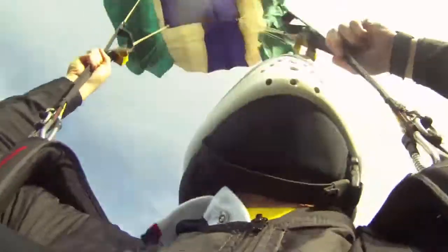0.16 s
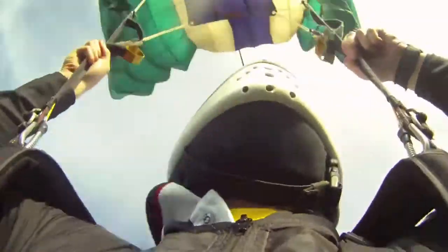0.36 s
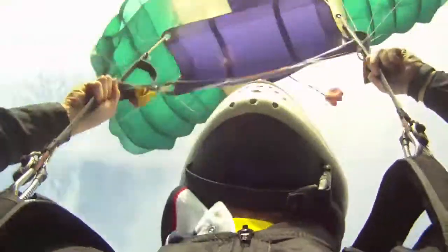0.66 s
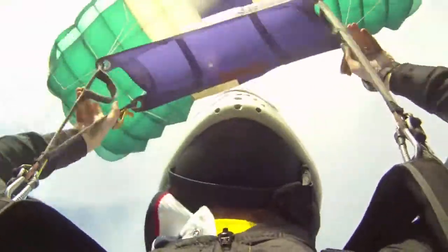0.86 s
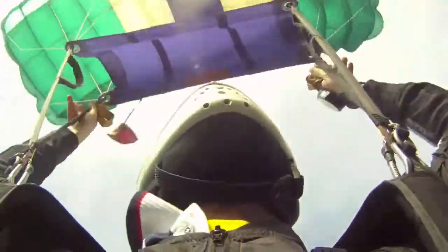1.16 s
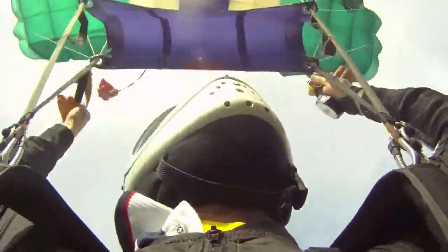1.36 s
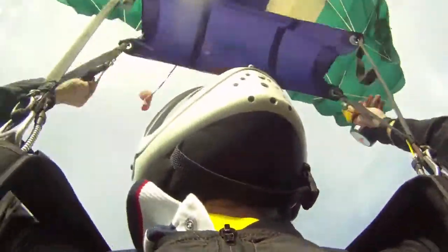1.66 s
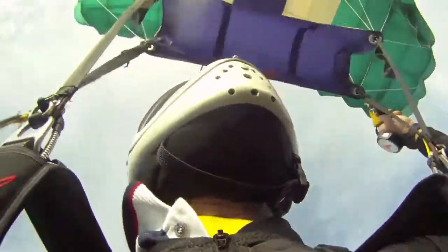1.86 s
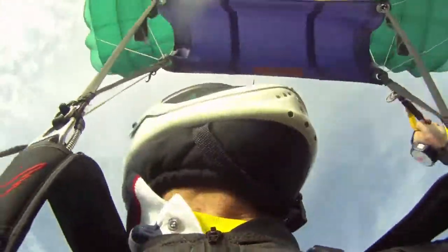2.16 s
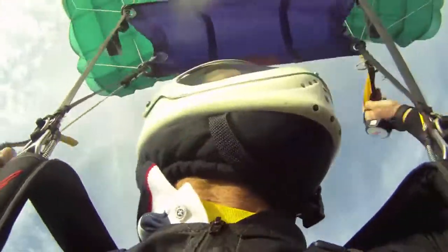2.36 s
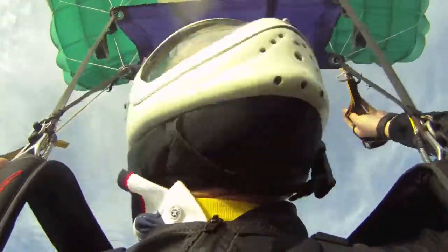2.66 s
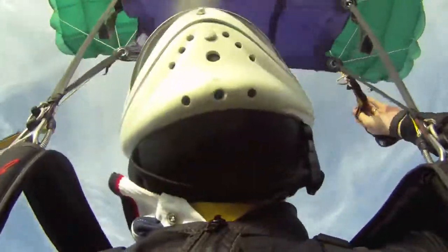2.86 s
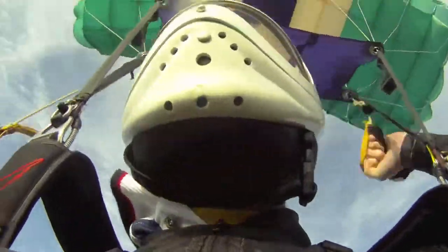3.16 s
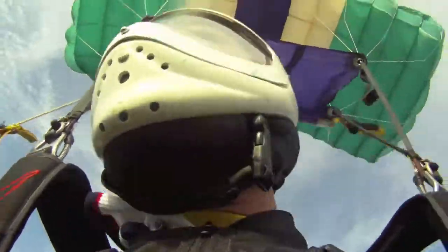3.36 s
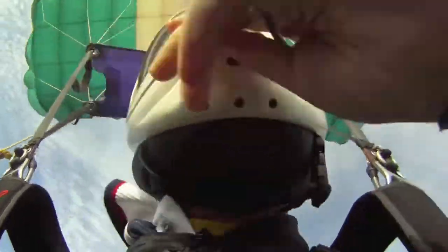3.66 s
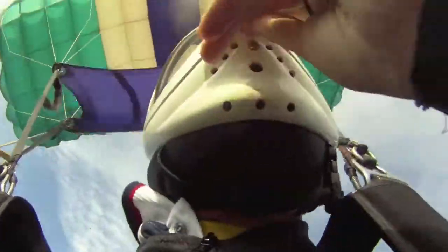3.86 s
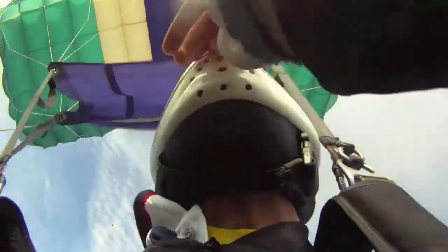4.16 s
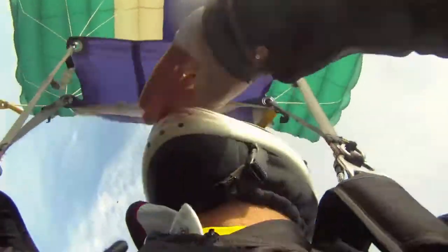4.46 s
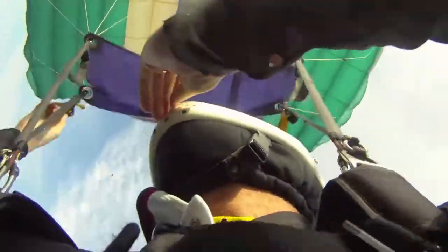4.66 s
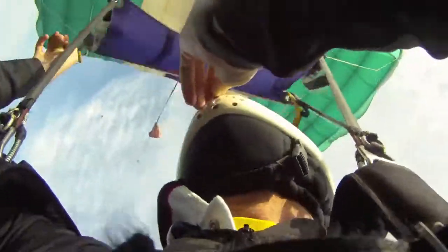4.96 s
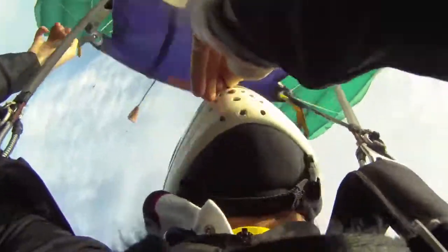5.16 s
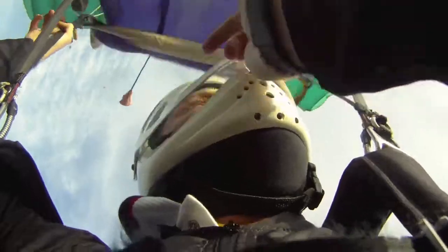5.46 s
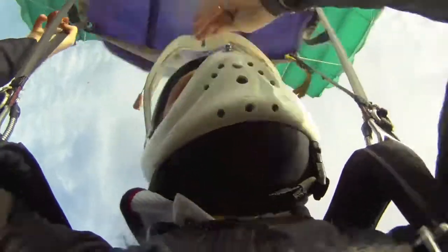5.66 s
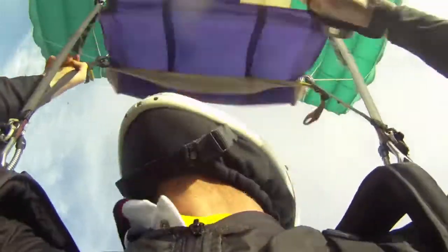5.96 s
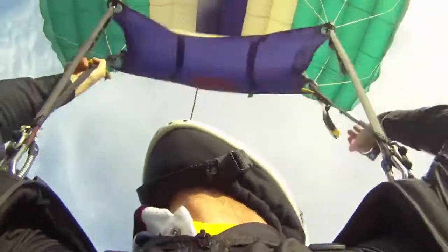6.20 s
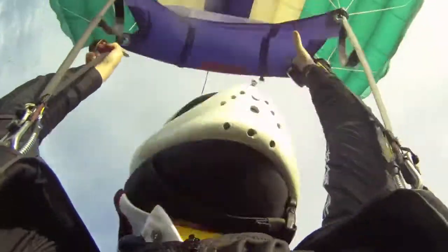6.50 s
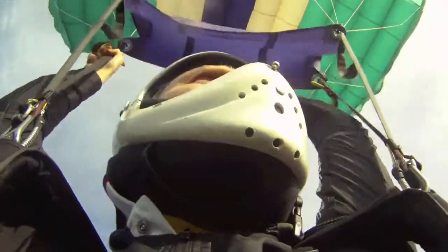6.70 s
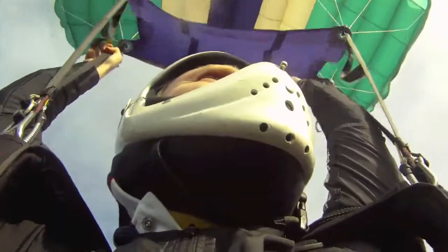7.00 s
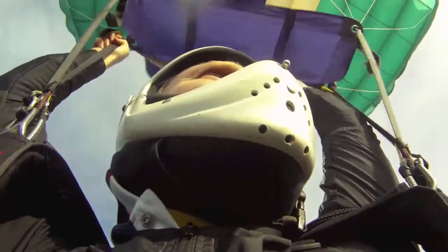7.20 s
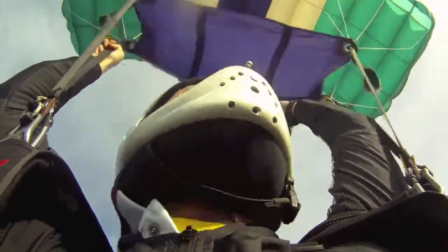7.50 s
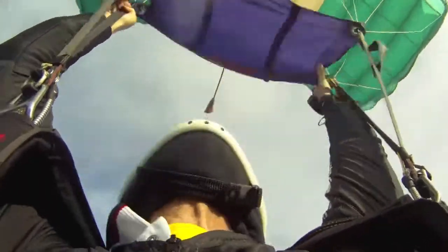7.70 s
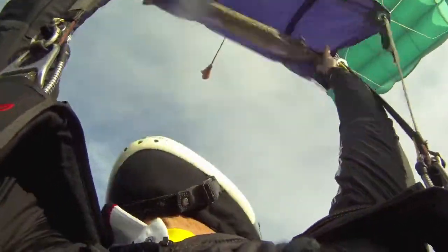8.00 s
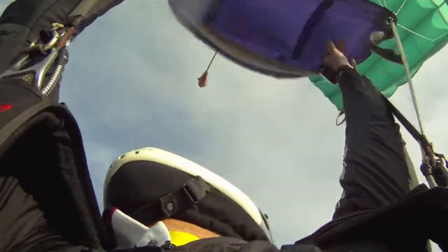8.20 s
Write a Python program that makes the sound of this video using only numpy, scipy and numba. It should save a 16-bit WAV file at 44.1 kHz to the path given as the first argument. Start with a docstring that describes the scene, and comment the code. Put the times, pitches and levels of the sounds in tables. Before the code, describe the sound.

A camera worn on the body, close in the wind under a freshly opened parachute, identical in both ears. From 0 s, low rumble and rough hiss press on its plastic case, with gust thumps near 0.2 and 0.7 s and hard ticks at about 0.3 and a strong one at 0.8 s. From 1 to 4 s the wind thins into uneven hissing surges and soft low bumps, with a few lone flaps, small clicks, a tick at 3.4 s and barely audible metal chinks. Around 4.1 s faint cloth flutter begins; a sharp tick lands at 4.5 s. From about 5.5 s, and strongly after 6 s, fabric beats around ten times a second, each slap crackling over a low throb. Brief whistles slide near 5.9, 6.4, 6.7 and 7.8 s. A hard click comes at 6.9 s, a gust at 7.7 s, and flapping continues to 8.3 s, compressed and fizzy.

```python
"""Gusts buffet the plastic housing of a body-worn camera under a freshly opened parachute: filtered noise.
Air hisses over the case as flickering noise; the cloth slider flaps, in the end about ten times a second,
each flap a noise slap plus crackle grains. Struck contacts tick and ring the housing; fittings chink as
fading noise; gliding sines whistle. A limiter and coarse held samples add a glassy fizz."""
import sys
import numpy as np
from scipy import signal
from scipy.fft import rfft, irfft
from scipy.io import wavfile
from scipy.ndimage import uniform_filter1d
from numba import njit

SR = 44100
rng = np.random.default_rng(int(sys.argv[2]) if len(sys.argv) > 2 else 0)


def output_pcm(signal):
    """Save a mono or channel-first signal as 16-bit PCM at the path in sys.argv[1].

    Samples are clipped to [-1, 1] before scaling.
    """
    pcm = np.clip(np.atleast_2d(signal).T, -1, 1) * 32767
    wavfile.write(sys.argv[1], SR, np.round(pcm).astype(np.int16))


N = 367794
TIME = np.arange(N) / SR
FREQ = np.maximum(np.fft.rfftfreq(N, 1 / SR), 1)


def undb(db):
    """Decibels to amplitude gain."""
    return 10 ** (np.asarray(db) / 20)


def curves(table):
    """Columns after the first, interpolated linearly in time."""
    time_s, *columns = np.transpose(table)
    return [np.interp(TIME, time_s, column) for column in columns]


def unit(x):
    """Scale to rms 1."""
    return x / np.sqrt(np.mean(x ** 2) + 1e-18)


def noise():
    """White Gaussian noise."""
    return rng.standard_normal(N)


def walk(rate_hz):
    """Random levels held for 1 / rate_hz, smoothed twice; rms 1."""
    hold = max(int(SR / rate_hz), 2)
    steps = np.repeat(noise()[:N // hold + 1], hold)
    smooth = uniform_filter1d(uniform_filter1d(steps, hold), hold)
    return unit(smooth[:N])


def colour(x, spectrum):
    """Shape by a spectrum interpolated over log frequency; rms 1."""
    hz, db = np.transpose(spectrum)
    gain = undb(np.interp(np.log(FREQ), np.log(hz), db))
    return unit(irfft(rfft(x) * gain, N))


def grains(rate_hz, spread_db):
    """Dense random clicks of either sign and uneven size."""
    struck = rng.random(N) < rate_hz / SR
    sign = np.sign(noise())
    return struck * sign * undb(spread_db * np.minimum(rng.exponential(size=N), 4))


def add(out, time_s, x):
    """Mix a short sound into out at time_s."""
    i = max(int(time_s * SR), 0)
    out[i:i + len(x)] += x[:N - i]


def swells(table):
    """Summed gain of Gaussian swells, from rows of (middle [s], length [s], level [dB])."""
    out = np.zeros(N)
    for middle_s, length_s, db in table:
        near = slice(*np.searchsorted(TIME, [middle_s - 2 * length_s, middle_s + 2 * length_s]))
        out[near] += undb(db) * np.exp(-(2 * (TIME[near] - middle_s) / length_s) ** 2)
    return out


# housing resonances: (frequency [Hz], width [Hz], level [dB])
HOUSING_MODES = [(550, 190, -18.5), (672, 220, -5.5), (1013, 188, -0.5), (1222, 150, 1), (1601, 254, -2),
                 (2090, 314, 2), (2440, 196, 2.5), (3176, 570, -3.5), (3628, 200, 2), (4700, 2000, -12),
                 (5150, 550, -14.5)]


def housing_ring(size=2048):
    """Causal minimum-phase ring of the plastic case, from its resonance power via the cepstrum."""
    f = np.fft.rfftfreq(size, 1 / SR)
    power = sum(undb(db) ** 2 / (1 + ((f - hz) / width_hz) ** 2 * 2) ** 2
                for hz, width_hz, db in HOUSING_MODES)
    cepstrum = irfft(np.log(power) / 2)
    cepstrum[1:size // 2] *= 2
    cepstrum[size // 2 + 1:] = 0
    return irfft(np.exp(rfft(cepstrum)))[:size // 2]


def housed(x):
    """A sound as it arrives through the case."""
    return signal.oaconvolve(x, housing_ring())[:len(x)]


# runs of even flutter, each until the next:
# (start [s], approximate rate [flaps/s], relative body [dB], relative crackle [dB], nominal flap length [s])
FLUTTER_RUNS = [(4.104, 8, -55, -72, 0.035), (4.35, 6.4, -51.5, -72, 0.012),
                (4.818, 6.2, -49, -38.5, 0.037), (5.136, 8, -51, -42.5, .028),
                (5.262, 9, -53, -43.5, 0.058), (5.483, 9.3, -44, -40, 0.02), (5.911, 11, -46, -42.5, 0.027),
                (6.002, 11.5, -43, -35.5, 0.037), (6.178, 8.4, -37.5, -35, .026),
                (6.292, 12, -48, -44, 0.064), (6.465, 10, -38, -31.5, .026), (6.666, 10, -36, -31, 0.019),
                (6.967, 10, -53, -54, 0.021), (7.063, 11, -44, -39.5, 0.043), (7.338, 10, -42, -37, 0.02),
                (7.442, 13, -42.5, -38.5, 0.017), (7.518, 10.5, -41, -35, 0.026),
                (7.712, 12, -45, -35.5, 0.019), (7.794, 9, -41, -33, 0.024), (8.23, 9, -35.5, -29.5, 0.023)]
# lone flaps before the flutter:
# (time [s], relative body [dB], relative crackle [dB], nominal length [s])
SINGLE_FLAPS = [(.643, -57, -45, .03), (1.711, -47, -74, 0.012), (2.48, -54, -47, 0.0075),
                (2.895, -50, -60, 0.016)]


def flaps():
    """Every flap as (time, body, crackle, length); a whole number of them fills each flutter run."""
    flutter = []
    end_times = [run[0] for run in FLUTTER_RUNS[1:]] + [N / SR]
    for (start_s, rate_hz, *flap), end_s in zip(FLUTTER_RUNS, end_times):
        count = max(round((end_s - start_s) * rate_hz), 1)
        flutter += [(s, *flap) for s in np.linspace(start_s, end_s, count, endpoint=False)]
    return SINGLE_FLAPS + flutter


# gust rumble spectrum: (frequency [Hz], relative level [dB])
RUMBLE_SPECTRUM = [(10, -14), (22, 2), (35, -2.5), (52, -5.5), (75, -15.5), (110, -38), (200, -89),
                   (400, -101)]
# small-eddy spectrum: (frequency [Hz], relative level [dB])
EDDY_SPECTRUM = [(40, -7.5), (90, -1), (140, -1), (200, -8.5), (300, -15.5), (500, -24.5), (1000, -22),
                 (2000, -75)]
# pressure swings after each flap: (frequency [Hz], decay [s], relative level [dB])
THROB_MODES = [(20.94, 0.05, -1.5), (48.6, 0.033, 2)]
# steady buffeting, strong during the opening and when the cloth beats hardest:
# (time [s], relative rumble level [dB])
BUFFETING_LEVEL = [(0, -37), (.55, -40), (1.0, -47.5), (4.4, -55.5), (5.7, -57.5), (6.12, -37), (7.73, -35),
                   (7.92, -49), (8.34, -42.5)]
# small eddies, dying down as the canopy slows the fall, then partly returning:
# (time [s], relative level [dB])
EDDY_LEVEL = [(0.0, -38), (0.25, -48.5), (0.74, -54.5), (0.93, -59), (3.23, -67.5), (3.37, -64),
              (4.46, -66), (6.76, -57.5), (8.34, -53.5)]
# gusts thumping the case: (middle [s], length [s], relative rumble [dB], relative eddies [dB])
GUST_THUMPS = [(0.16, 0.028, -27, -32.5), (0.676, 0.026, -20, -33), (0.873, 0.07, -35.5, -53),
               (1.16, 0.14, -41.5, -75), (1.47, 0.18, -52, -61), (1.73, 0.067, -44, -65),
               (1.906, 0.18, -34.5, -61.5), (2.095, 0.19, -42, -63), (2.73, 0.13, -39, -70),
               (3.02, 0.21, -41, -66), (3.378, 0.37, -40, -62), (4, 0.35, -41.5, -66),
               (7.741, 0.031, -30, -49)]


def buffet(rumble_db=1, eddy_db=4.0, throb_db=-4, lag_s=0.043, eddy_flicker_db=2.5, size=12000):
    """Turbulence presses on the case; a decaying pressure swing follows each flap of the cloth."""
    (rumble_curve_db,), (eddy_curve_db,) = curves(BUFFETING_LEVEL), curves(EDDY_LEVEL)
    t, pushes = np.arange(size) / SR, np.zeros(N)
    swing = sum(undb(db) * np.exp(-t / decay_s) * np.sin(2 * np.pi * hz * t)
                for hz, decay_s, db in THROB_MODES)
    for time_s, *_ in flaps():
        add(pushes, time_s + lag_s, swing)
    # random gusts recede where the cloth beats steadily
    beating = np.clip(uniform_filter1d(unit(pushes) ** 2, size=SR // 4) / 2, 0, 1)
    gusts = colour(noise(), RUMBLE_SPECTRUM) * undb(rumble_db) * (1 - beating / 2)
    rumble = gusts + undb(throb_db) * unit(pushes)
    eddies = colour(noise(), EDDY_SPECTRUM) * undb(eddy_db + eddy_flicker_db * walk(30))
    rumble_thumps = swells([(s, length_s, db) for s, length_s, db, _ in GUST_THUMPS])
    eddy_thumps = swells([(s, length_s, db) for s, length_s, _, db in GUST_THUMPS])
    rumble_gain = np.hypot(undb(rumble_curve_db), rumble_thumps)
    eddy_gain = np.hypot(undb(eddy_curve_db), eddy_thumps)
    return rumble * rumble_gain + eddies * eddy_gain


# hiss spectrum: (frequency [Hz], relative level [dB])
HISS_SPECTRUM = [(100, 24), (400, -8.5), (900, 2), (2500, 0.5), (3000, -6.5), (4000, -23), (6000, -12)]
# sharp edge of the hiss: (frequency [Hz], relative level [dB])
EDGE_SPECTRUM = [(300, -53), (2200, -12), (3000, -0.5), (4000, 4.5), (6000, -3)]
# steady airflow: (time [s], relative hiss level [dB], relative edge level [dB])
AIRFLOW_LEVEL = [(0.0, -39, -47), (0.3, -51, -60.5), (0.67, -43.5, -53), (0.86, -49, -63), (1.48, -59, -68),
                 (1.74, -52, -68), (2.39, -55.5, -68.5), (2.65, -62, -70.5), (3.11, -59, -74.5),
                 (3.41, -53.5, -71), (4.5, -55.5, -72), (5.48, -52, -60), (6.3, -51.5, -66),
                 (6.62, -49, -58.5), (7.04, -53.5, -63.5), (7.36, -57, -66.5), (7.78, -46, -56.5),
                 (8.34, -53.5, -57)]
# hiss surges as air catches an edge: (middle [s], length [s], relative level [dB])
HISS_SURGES = [(.58, .11, -37), (.665, 0.039, -34.5), (.94, 0.069, -45.5), (1.2, .16, -49.5),
               (1.66, 0.42, -51.5), (2.11, 0.082, -48), (2.42, 0.29, -48.5), (3.32, 0.19, -52.5),
               (3.72, 0.13, -50), (4.22, .16, -52.5), (4.68, 0.11, -52), (5.96, 0.16, -51.5),
               (6.7, 0.12, -66)]


def rush(hiss_db=-.5, edge_db=0.0, surge_db=0, surge_edge_db=-15, flicker_db=2.5, grit_db=-5,
         lull_db=4, lull_lead_s=0.021, lull_s=0.02, split_hz=1600, wander_db=1.48):
    """Air tears past the case in a flickering, gritty hiss that dips just before each flap."""
    flow_db, sharp_db = curves(AIRFLOW_LEVEL)
    surge = swells(HISS_SURGES) * undb(surge_db)
    lulls = swells([(time_s - lull_lead_s, lull_s, 0) for time_s, *_ in flaps()])
    air = unit(noise() + undb(grit_db) * unit(grains(1500, 6.0)))
    hiss = colour(housed(air), HISS_SPECTRUM) * np.hypot(undb(flow_db + hiss_db), surge)
    edge_gain = np.hypot(undb(sharp_db + edge_db), surge * undb(surge_edge_db))
    edge = colour(housed(noise()), EDGE_SPECTRUM) * edge_gain
    flicker = undb(flicker_db * walk(55) - lull_db * lulls)
    # the hiss turns darker and brighter as the air shifts its angle
    dark = irfft(rfft(hiss) / (1 + (FREQ / split_hz) ** 6), N)
    tilt = undb(wander_db * walk(9))
    return (dark / tilt + (hiss - dark) * tilt + edge) * flicker


# cloth slap spectrum: (frequency [Hz], relative level [dB])
SLAP_SPECTRUM = [(80, 18.5), (200, -1), (350, 8.5), (600, 9.5), (900, -5.5), (1500, -45), (4000, -59)]
# crackle spectrum ahead of the case: (frequency [Hz], relative level [dB])
CRACKLE_SPECTRUM = [(200, 28), (700, -0.5), (1200, 15), (2400, 7.5), (3400, 2.5), (6000, 1)]


def slider(body_db=-5, crackle_db=-6.0, ripple_db=3, lag_s=0.00197, crackle_share=0.5,
           first_snap_db=11, uneven=0.092, size=4096):
    """Each flap is a soft slap, a snap as the cloth goes taut, and a spray of crackles from its creases."""
    out, t = np.zeros(N), np.arange(size) / SR
    ripple = undb(ripple_db * walk(220))
    slaps = colour(noise(), SLAP_SPECTRUM) * ripple
    creases = unit(grains(2500, 2.5)) * ripple
    hz, db = np.transpose(CRACKLE_SPECTRUM)
    crackle_gain = undb(np.interp(np.log(np.fft.rfftfreq(size, 1 / SR) + 1), np.log(hz), db))
    for k, (time_s, slap_db, snap_db, nominal_s) in enumerate(flaps()):
        own = slice(k * size, (k + 1) * size)
        length_s = max(nominal_s, .005) * np.exp(uneven * rng.standard_normal())
        slap = slaps[own] * (1 - np.exp(-t / .002)) * np.exp(-(t / length_s) ** 3.0)
        spray = creases[own] * np.exp(-(t / (length_s * crackle_share)) ** 0.78)
        spray = spray + undb(first_snap_db) * (t == 0)
        crackle = housed(irfft(rfft(np.roll(spray, size // 64)) * crackle_gain))
        # scaled by the level over the first 20 ms
        add(out, time_s + lag_s, slap / slap[:SR // 50].std() * undb(slap_db + body_db))
        add(out, time_s + lag_s, crackle / crackle[:SR // 50].std() * undb(snap_db + crackle_db))
    return out


# hard ticks on the housing:
# (time [s], relative level [dB], contact band centre [Hz], chatter length [s], broadband share [dB])
HOUSING_TICKS = [(0.166, -26, 930, 0.0046, -6), (0.278, -23.5, 2090, 0.0018, -20),
                 (0.35, -20.5, 850, 0.0042, -42), (0.805, -11.5, 2340, 0.0039, -24),
                 (1.858, -33, 1380, 0.0087, -21), (2.447, -31.5, 2440, 0.0029, -28),
                 (2.936, -47, 1650, 0.0054, -27), (2.996, -49, 950, 0.0032, -29),
                 (3.391, -24, 2260, 0.0047, -24), (3.597, -41.5, 2080, 0.0034, -22),
                 (4.543, -16.5, 2420, 0.0024, -13), (4.933, -39.5, 2385, 0.0028, -22),
                 (4.988, -31, 1320, 0.0034, -10), (5.2319, -32, 2270, 0.0023, -22),
                 (6.917, -16.5, 2440, 0.0014, -7), (7.662, -32.5, 1940, 0.0064, -28),
                 (8.192, -21.5, 2480, 0.0025, -31)]


def ticks(tick_db=-4, chatter_db=-11, contact_width=0.32, size=2048):
    """A hard contact chatters for a moment and rings the case, mostly around one band."""
    out, t = np.zeros(N), np.arange(size) / SR
    f = np.maximum(np.fft.rfftfreq(size, 1 / SR), 1)
    chatters = rng.standard_normal((len(HOUSING_TICKS), size))
    for (time_s, db, hz, chatter_s, broadband_db), chatter in zip(HOUSING_TICKS, chatters):
        force = (t == 0) + undb(chatter_db) * chatter * np.exp(-(t / chatter_s) ** 4)
        contact = 1 / (1 + 1j * (f / hz - hz / f) / contact_width) + undb(broadband_db)
        ring = housed(irfft(rfft(force) * contact))
        # scaled by the level over the first 5 ms
        add(out, time_s, ring / ring[:SR // 200].std() * undb(db + tick_db))
    return out


# faint chinks of the harness fittings: (time [s], relative level [dB])
FITTING_CHINKS = [(1.1, -50), (1.923, -46.5), (3.4327, -49), (3.95, -49.5), (4.586, -49.5), (7.205, -50)]


def fittings(chink_db=-3, ring_s=0.008, size=4096):
    """Metal rings and links chink thinly: treble noise under exponential decays."""
    fade, t = np.zeros(N), np.arange(size) / SR
    for time_s, db in FITTING_CHINKS:
        add(fade, time_s, undb(db + chink_db) * np.exp(-t / ring_s))
    return fade * colour(noise(), [(1500, -40), (3200, -19), (4700, 9.5), (5500, -5.0)])


# faint whistles, probably from taut lines in the wind:
# (start [s], end [s], start pitch [Hz], end pitch [Hz], relative level [dB])
LINE_WHISTLES = [(1.225, 1.313, 2160, 2070, -50), (2.6, 2.868, 4570, 4320, -84),
                 (2.73, 2.862, 1545, 1390, -62), (2.844, 2.966, 1800, 1660, -61.5),
                 (5.895, 5.984, 2550, 2367, -46.5), (6.42, 6.494, 2190, 2200, -45),
                 (6.682, 6.847, 2260, 2000, -49), (7.706, 7.876, 2264, 2090, -50)]


def whistles(whistle_db=-1, waver=0.0068, unsteady_db=3):
    """Vortices, probably shed by taut lines, sing gliding, wavering tones that swell and fade."""
    out = np.zeros(N)
    wobble = 1 + waver * walk(250)
    strength = undb(whistle_db + unsteady_db * walk(70))
    for start_s, end_s, from_hz, to_hz, db in LINE_WHISTLES:
        part = np.clip((TIME - start_s) / (end_s - start_s), 0, 1)
        hz = (from_hz + (to_hz - from_hz) * part) * wobble
        out += undb(db) * np.sin(np.pi * part) * np.sin(2 * np.pi * np.cumsum(hz) / SR)
    return out * strength


def scene():
    """One microphone, the same in both ears."""
    mono = buffet() + rush() + slider() + ticks() + fittings() + whistles()
    return np.array([mono, mono])


@njit
def follow(x, attack, release):
    """Peak follower with per-sample attack and release coefficients."""
    out, level = np.empty(len(x)), 0.
    for i in range(len(x)):
        level += (abs(x[i]) - level) * (attack if abs(x[i]) > level else release)
        out[i] = level
    return out


def record(dry, attack_s=0.00039, release_s=0.13, ceiling_db=-17.6, hold_hz=12000, top_hz=15200):
    """A limiter ducks peaks and clips what slips past; held samples mirror the sound into the treble."""
    ceiling = undb(ceiling_db)
    coarse = signal.resample_poly(dry[0], hold_hz, SR)
    peak = follow(coarse, 1 - np.exp(-1 / (attack_s * hold_hz)), 1 / (release_s * hold_hz))
    ducked = coarse * np.minimum(1, ceiling / (peak + 1e-9))
    limited = np.clip(ducked, -ceiling, ceiling)
    # holding each sample as a step mirrors the spectrum around the hold rate
    held = signal.resample_poly(np.repeat(limited, 4), SR, 4 * hold_hz)[:N]
    out = signal.sosfilt(signal.ellip(10, .2, 70, top_hz, fs=SR, output="sos"), held)
    return np.array([out, out])


dry = scene()
out = record(dry)
output_pcm(out)
```